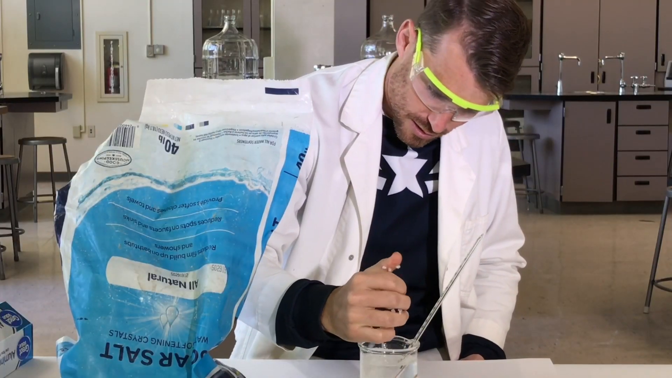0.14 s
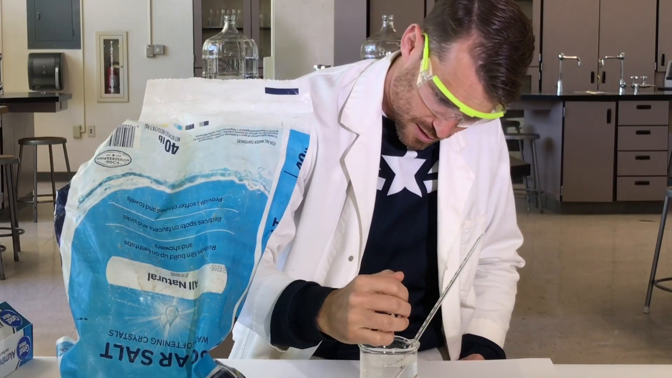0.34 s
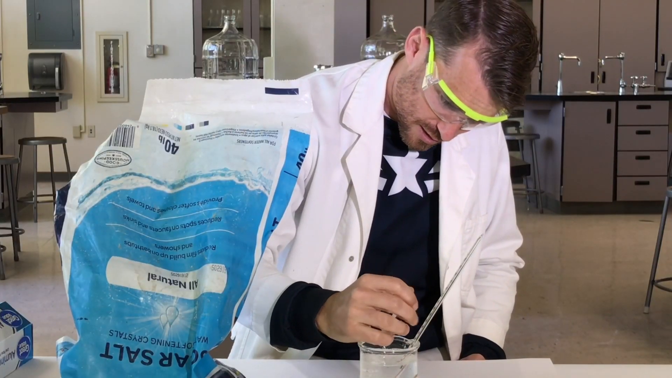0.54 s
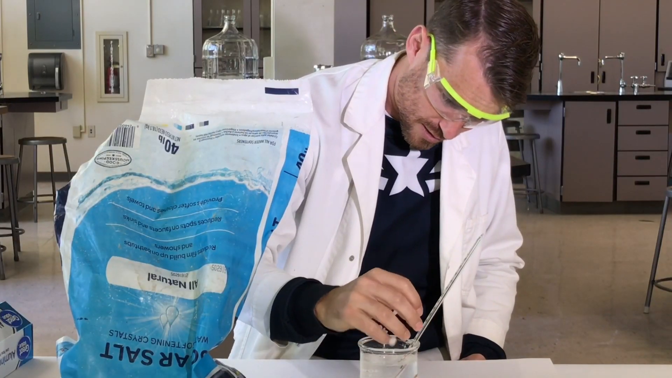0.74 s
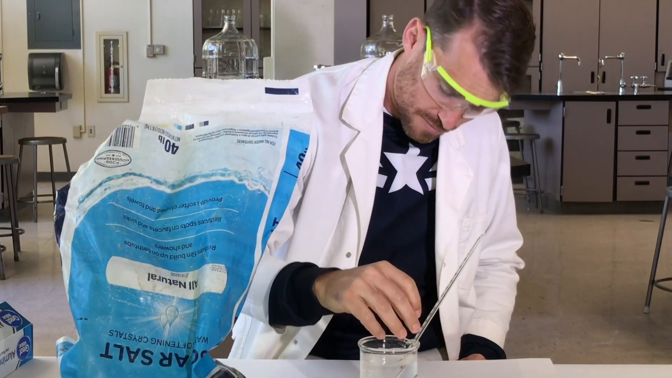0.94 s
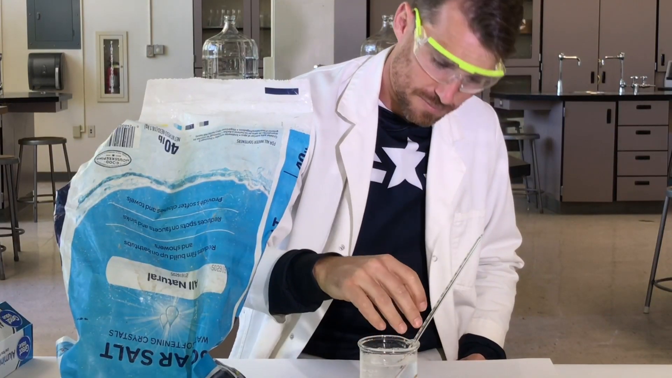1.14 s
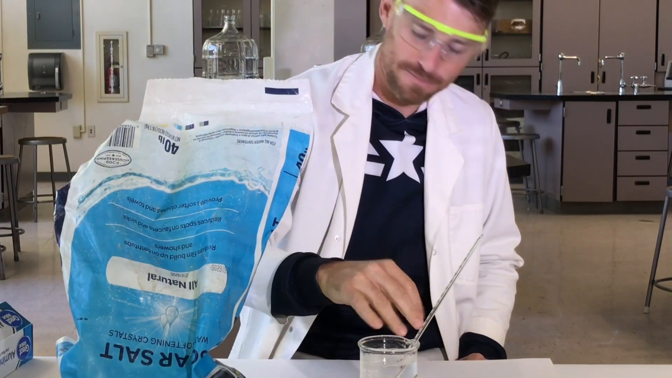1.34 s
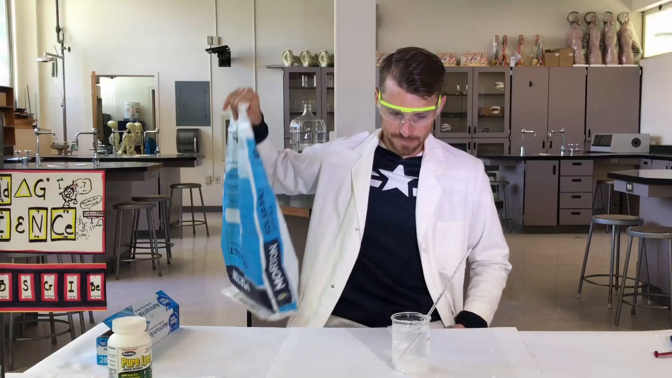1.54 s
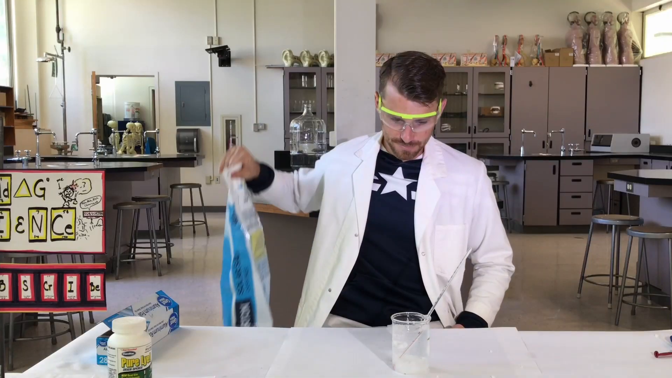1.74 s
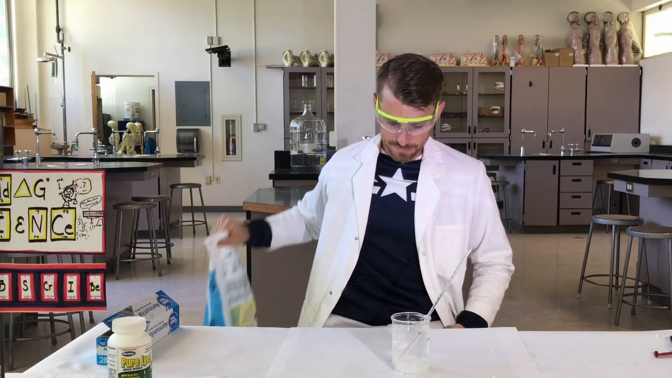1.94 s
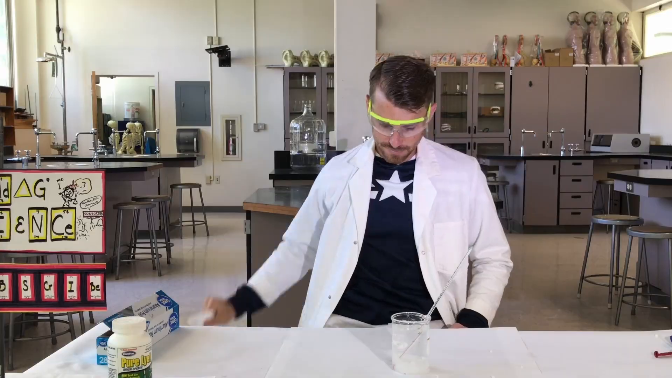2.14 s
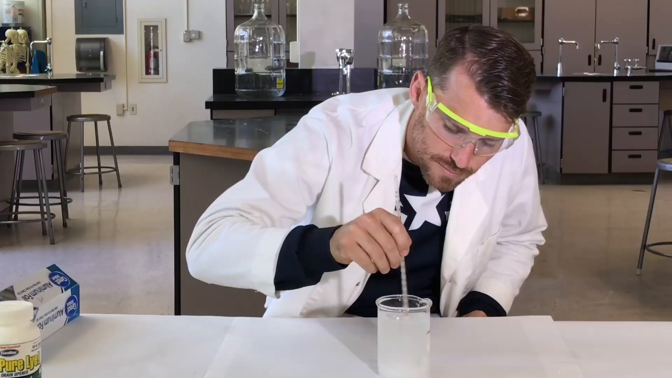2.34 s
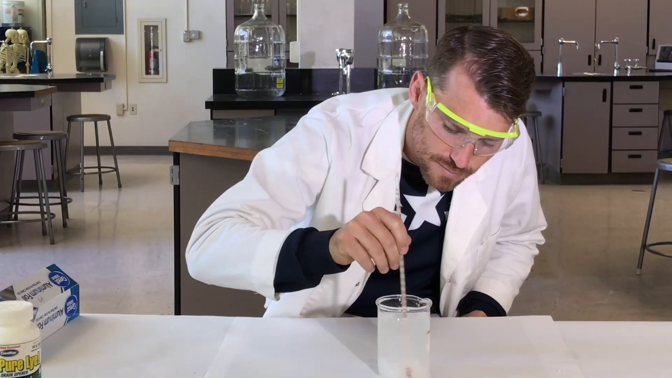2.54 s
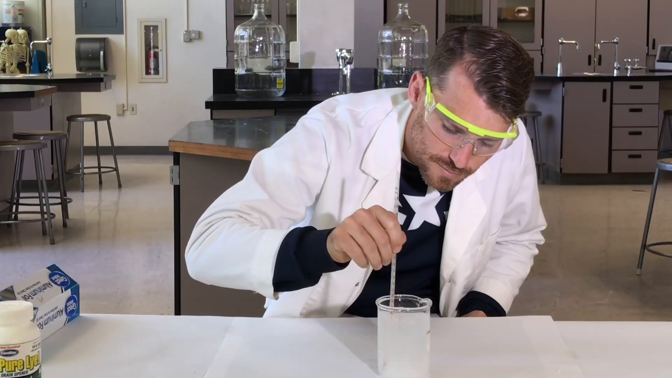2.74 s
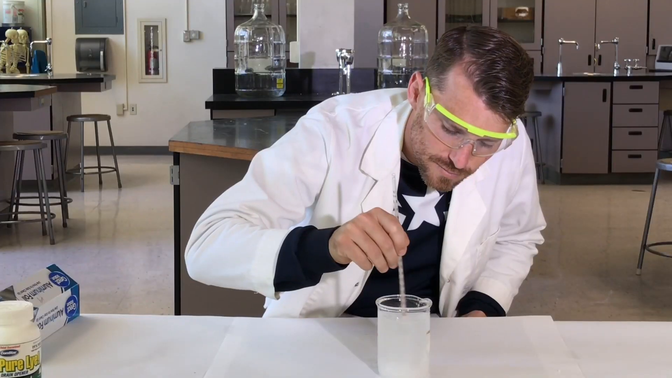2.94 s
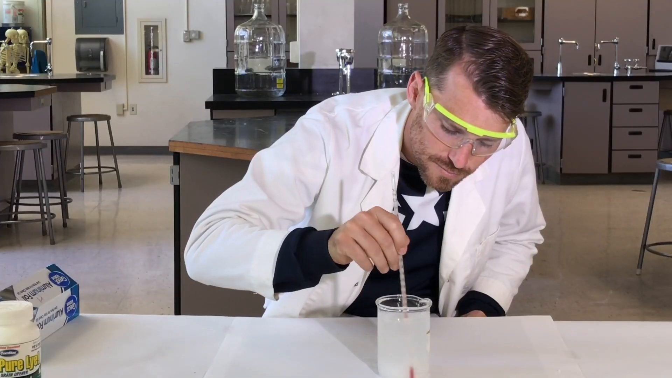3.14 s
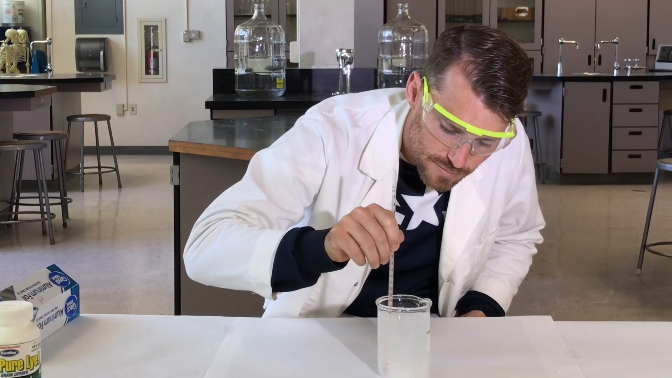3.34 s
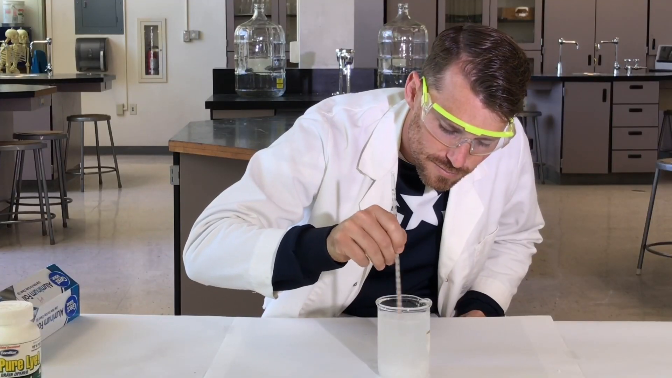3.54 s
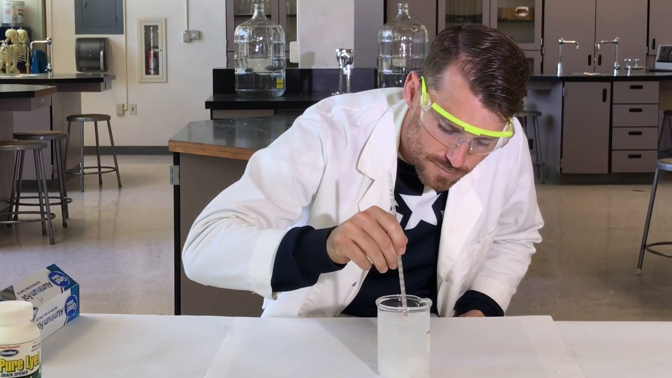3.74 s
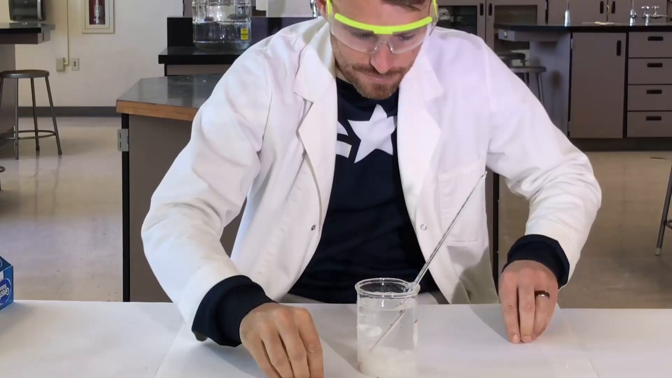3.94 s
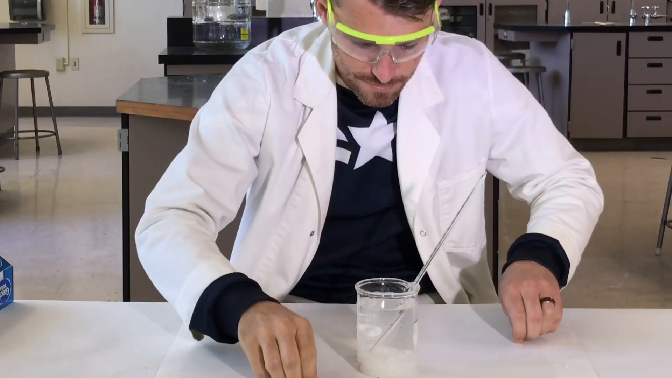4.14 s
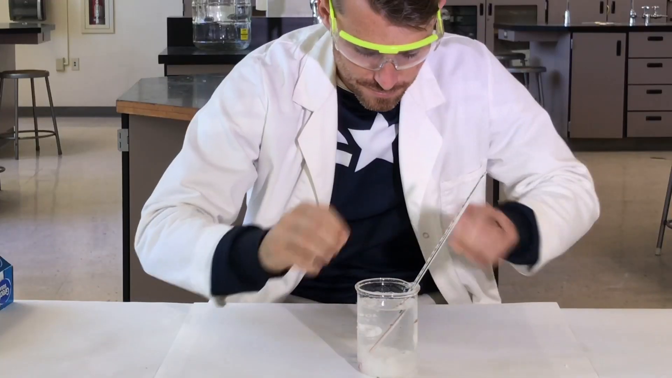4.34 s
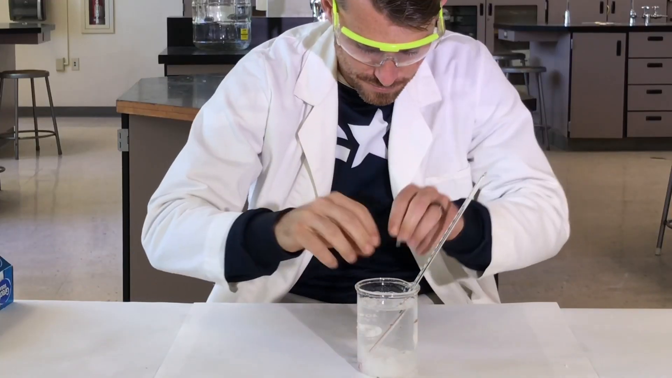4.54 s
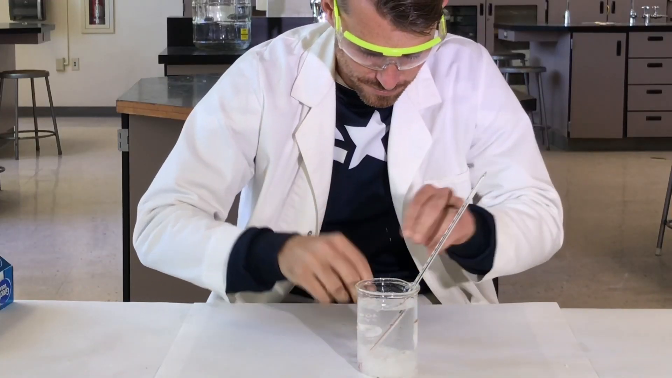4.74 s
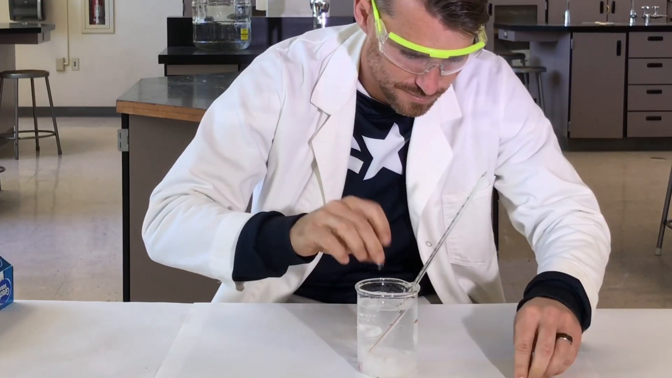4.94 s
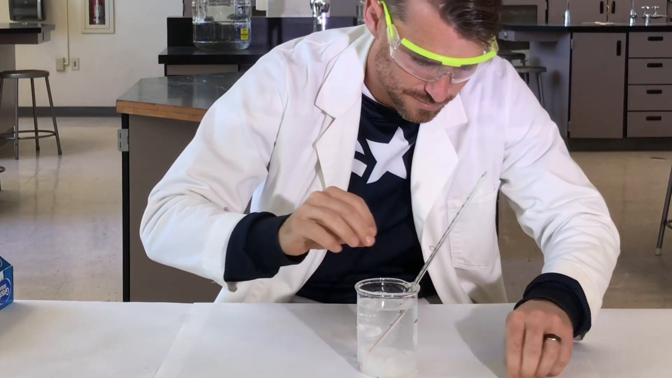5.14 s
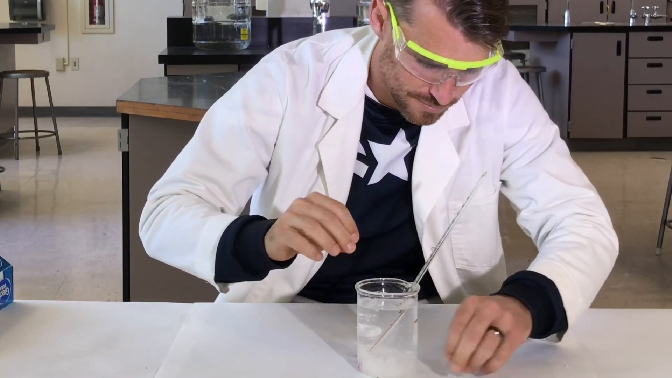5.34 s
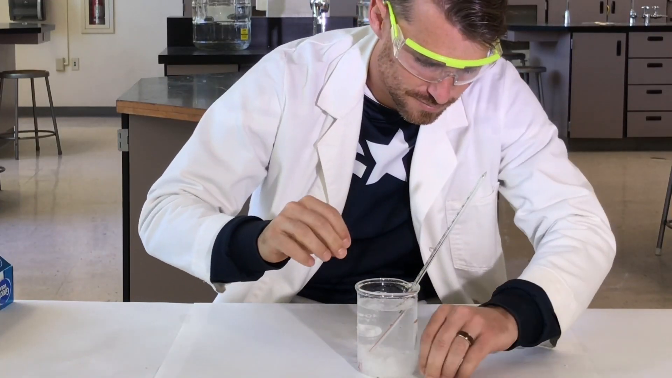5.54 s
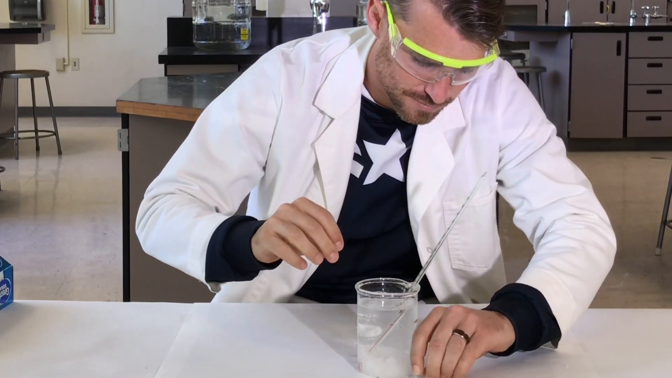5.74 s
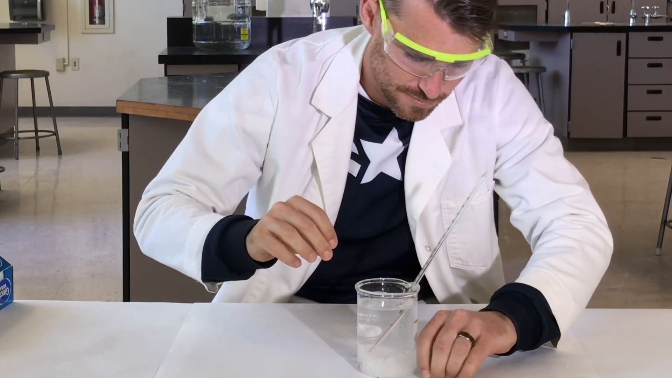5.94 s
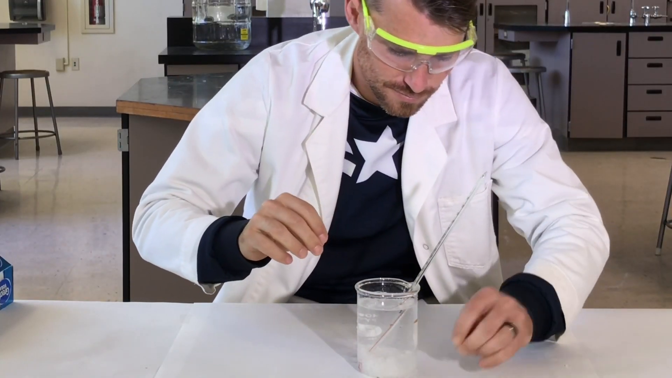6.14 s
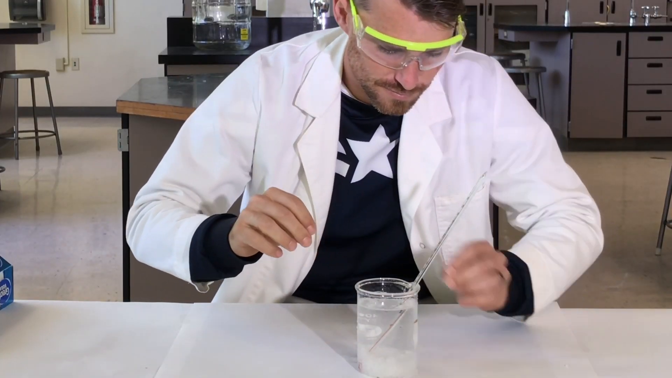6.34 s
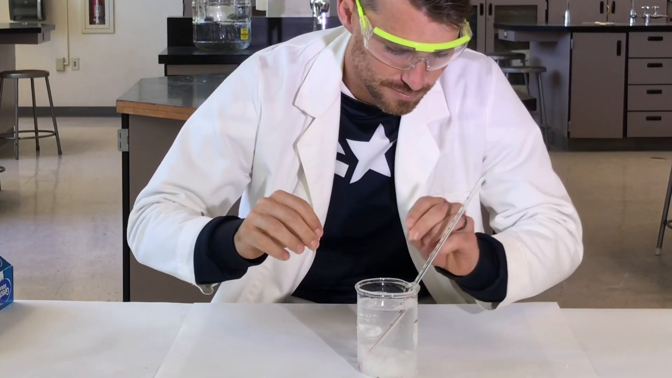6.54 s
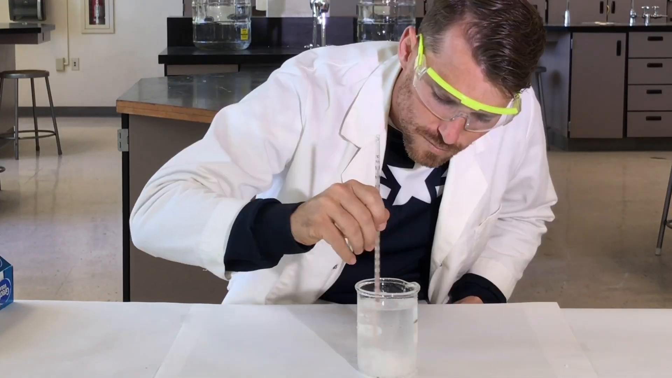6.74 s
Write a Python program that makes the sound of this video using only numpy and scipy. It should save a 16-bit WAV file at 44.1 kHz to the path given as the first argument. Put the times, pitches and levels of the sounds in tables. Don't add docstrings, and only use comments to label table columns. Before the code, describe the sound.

Low ventilation runs throughout a hard-walled lab. Near the microphone, crystals plink into water and click on glass; after a cut, a plastic sack farther off creases, snaps sharply twice and thumps down, loudest of all. Another abrupt cut brings gritty stirring with dull, water-damped glass knocks and crunches. Then hands brush and tap the bench, a few crystals drop, and a low motor faintly winds up.

```python
import sys
import numpy as np
from scipy import signal
from scipy.fft import rfft, irfft
from scipy.io import wavfile
from scipy.ndimage import uniform_filter1d

SR = 44100
rng = np.random.default_rng(int(sys.argv[2]) if len(sys.argv) > 2 else 0)


def waveform_to_disk(signal):
    frames = np.transpose(np.atleast_2d(signal))
    scaled = np.clip(frames, -1, 1) * 32767
    samples = np.round(scaled).astype(np.int16)
    wavfile.write(sys.argv[1], SR, samples)


def amplitude_ratio(level_db):
    exponent = np.asarray(level_db, float) / 20
    return 10 ** exponent


N = 299432

# t/s of silence, fade out/s, fade in/s
JOINS = [
    (1.508, 0.049, 0.02),
    (2.307, 0.027, 0.006),
    (3.941, 0.024, 0.0083),
    (4.806, 0.0345, 0.024),
    (6.773, 0.032, 0.025),
]
# f/Hz, level/dB per Hz
AIR_COLOUR = [(15, -2.5), (35, 0.5), (72, -4.5), (115, -1.5), (180, -8.5), (260, -19), (450, -33),
              (700, -24.5), (1400, -29), (2400, -31.5), (4000, -34), (8000, -38), (13000, -41.5),
              (16000, -39.5)]
# t/s, level/dB
AIR_LEVEL = [(0, -46.5), (1.5, -43), (2.3, -42.5), (3.94, -43.5), (4.8, -44.5), (6.79, -43.5)]
# f/Hz, width/Hz, level/dB
HUMS = [(360, 30, -69.5), (438.4, 16, -64.5), (650, 5.4, -72.5), (1280, 12, -77), (1870, 8, -79),
        (2110, 8, -77)]
# t/s, low f/Hz, low level/dB, high f/Hz, high level/dB
MOTOR = [(4.82, 71, -61, 162.0, -60), (5.04, 73.1, -55.5, 162.0, -57), (5.39, 73.8, -57, 162.2, -55),
         (5.74, 74.8, -52, 163.4, -55.5), (6.0, 74.8, -53, 164.5, -55), (6.75, 74.7, -54.5, 164.9, -51),
         (6.78, 74.7, -70, 164.6, -68)]
# t/s, fall/s, f/Hz, width/Hz, level/dB
RINGS = [(0, 0.11, 424, 256, -36.5), (0, 0.089, 1394, 161, -40.5), (0, .12, 2280, 300, -48.5),
         (0.675, .17, 1040, 110, -52), (0.856, .13, 1040, 110, -54), (1.626, .09, 2700, 900, -46),
         (0.49, .1, 1320, 200, -50), (3.969, .015, 2000, 4000, -38), (4.071, .006, 8000, 7000, -55),
         (5.697, .07, 2500, 200, -47.5), (5.7, 0.2, 3240, 90, -57.5), (5.7, .08, 1580, 200, -47.5),
         (5.701, .025, 8800, 2000, -45)]
# peak t/s, rise/s, f/Hz, width/Hz, level/dB
RUBBED = [(0.034, 0.034, 8400, 1500, -42), (4.9, 0.15, 366, 36, -56), (5.15, 0.15, 372, 29, -56),
          (5.91, .05, 352, 40, -55), (6.025, .06, 358, 30, -54), (5.195, .04, 65, 40, -46),
          (1.385, .06, 12300, 300, -72), (1.54, .035, 8000, 2200, -57), (5.212, 0.2, 2550, 650, -60),
          (5.25, .05, 13500, 4500, -62), (3.4, .17, 370, 45, -56.5), (6.0, .08, 5700, 250, -64),
          (5.995, .07, 6700, 700, -60), (5.955, .08, 7800, 400, -66), (6.0, .05, 10000, 900, -63),
          (6.002, .03, 13000, 4500, -62), (4.11, .12, 8000, 3000, -60)]
# start t/s, peak t/s, end t/s, palm level/dB, grains level/dB
SWEEPS = [(1.497, 1.553, 1.6, -50.5, -56), (3.943, 3.963, 4.146, -41.5, -54),
          (3.852, 4.151, 4.22, -65.5, -61.5), (4.809, 4.891, 5.14, -56, -60),
          (5.023, 5.038, 5.23, -65, -92), (5.0, 5.236, 5.26, -53.5, -58), (5.593, 5.617, 5.69, -54, -64),
          (5.682, 5.693, 5.74, -32.5, -34.5), (5.691, 5.725, 5.82, -61, -80), (5.82, 5.85, 6.4, -56, -64),
          (5.835, 6.01, 6.03, -45.5, -54.5), (6.304, 6.354, 6.44, -74, -61), (6.771, 6.775, 7, -52, -44)]
# f/Hz, level/dB per Hz
PALM_COLOUR = [(250, -1), (400, 5.5), (1000, 5), (1700, -4), (2500, -6.5), (3300, -11), (5000, -19.5),
               (9000, -35)]
# f/Hz, level/dB per Hz
GRAIN_COLOUR = [(2500, 2.5), (4500, 5), (7500, 3.5), (10000, -0.5), (13000, -15), (16000, -20)]
# t/s, peak level/dB, centre f/Hz
TICKS = [(0.005, -31, 9350), (0.015, -41, 11500), (0.0446, -29.5, 8500), (0.0495, -36, 9000),
         (0.0742, -37, 11600), (0.158, -47, 11000), (0.1723, -35, 10500), (0.193, -33, 12600),
         (0.267, -45, 10000), (0.1082, -50, 3460), (0.1715, -49, 3270), (0.192, -34, 6200),
         (0.2155, -37.5, 11800), (0.2427, -38, 7560), (0.3554, -23, 8460), (0.3626, -37, 10100),
         (0.369, -32, 4950), (0.373, -38, 4130), (0.3988, -37, 7500), (0.418, -45, 3340),
         (0.4394, -39, 6200), (0.5344, -50, 5400), (0.631, -43, 8300), (0.647, -38.5, 6240),
         (0.667, -34, 3430), (0.837, -44, 7600), (0.8792, -37, 8460), (0.9204, -42.5, 8250),
         (0.952, -47, 7600), (0.9606, -48, 3350), (1.1135, -46, 7800), (1.222, -52, 7500),
         (1.231, -56, 12800), (3.9675, -40, 7000), (1.331, -56, 6500), (1.343, -56, 8000),
         (1.576, -52, 8500), (1.783, -43.5, 7600), (1.795, -35.5, 5196), (2.265, -17, 6480),
         (2.267, -13.5, 5500), (2.29, -17, 5010), (3.6499, -21, 8950), (4.61, -45.5, 5330),
         (5.562, -59, 8860), (5.609, -52, 7000), (5.692, -35.5, 8750), (5.7012, -29, 8450),
         (5.718, -44, 10800), (5.738, -57, 10100), (5.829, -56, 8500), (5.8705, -54, 10500),
         (5.925, -54, 7000), (6.6716, -44, 3640), (6.6713, -40, 8700)]
# t/s, peak level/dB, bubble f/Hz,
# splash level/dB
DROPS = [(0.029, -37.5, 382, -7), (0.218, -46.5, 700, -7), (0.266, -48, 377, 5), (0.355, -35, 480, 1),
         (0.482, -43, 353, -7), (0.667, -39.5, 347, 0), (0.848, -45, 360, 3),
         (0.024, -39, 1365, -12), (0.161, -41, 1330, -24), (0.198, -39.5, 1650, -5),
                (0.216, -41.5, 1500, -8), (0.266, -39.5, 1610, -6), (0.305, -34.5, 1213, -10),
                (0.355, -38, 1003, 1.5), (0.4809, -30, 1280, -18), (0.6332, -36.5, 1380, -18),
                (0.6676, -28, 1050, -11.5), (0.848, -34, 1015, -8), (0.952, -53, 980, 1),
                (4.5759, -55, 1370, -18),
         (0.0726, -53, 2510, -12), (0.106, -48, 2360, -10), (0.1714, -49, 3380, -15),
               (0.3032, -50.5, 2110, -4), (0.356, -39, 1740, 3), (0.424, -45.5, 3250, -6),
               (0.4815, -44, 1750, -9), (0.495, -47, 1870, -11), (0.207, -50, 2550, -9),
               (0.849, -54, 2400, -7), (0.6656, -44.5, 2410, -20), (0.8645, -39.5, 2280, -17),
               (0.9157, -44.5, 3040, -12), (1.065, -44.5, 2050, -12), (4.657, -44, 2380, -13),
               (5.0377, -41.5, 2110, -16)]
# t/s, level/dB
DUST_LEVEL = [(0.0, -46.5), (0.296, -58.5), (0.404, -57), (0.67, -62.5), (1.1, -72)]
# f/Hz, level/dB per Hz
DUST_COLOUR = [(250, 9), (500, 7), (1400, 3), (2400, -3), (4000, -5), (9000, -7.5), (16000, -13)]
# t/s, peak level/dB, brightness level/dB, upper modes level/dB
KNOCKS = [(2.323, -25.5, -19, -0.5), (2.563, -32, -25.5, 0), (2.572, -14.5, -40, -7),
          (2.867, -34.5, -35, 2), (2.9048, -24, -4, 1), (2.9085, -21.5, -7, 2), (2.927, -27, -14, -18),
          (2.951, -35, -5, -10), (3.05, -48.5, 15.5, -4), (3.187, -34, -8, -8), (3.2075, -20.5, -5, 1),
          (3.222, -23, -18, -13), (3.4723, -18.5, -12, -4), (3.487, -26.5, -14, -1.5)]
# f/Hz, level/dB, time to fall 60 dB/s
BEAKER = [(663, -1.5, 0.055), (756, -8.5, .035), (890, -8.5, 0.039), (1023, -5, 0.089), (1182, 7.5, 0.032),
          (1377, 1, 0.05), (1500, -2, 0.024), (2820, -11.5, .03)]
# t/s, scrape level/dB
STIR_LEVEL = [(2.305, -45), (2.325, -46.5), (2.354, -43), (2.5, -43.5), (2.53, -46.5), (2.768, -41.5),
              (2.85, -46.5), (3.06, -44), (3.33, -42), (3.436, -45), (3.6, -43), (3.78, -44.5),
              (3.88, -39.5), (3.94, -47.5)]
# f/Hz, level/dB per Hz
STIR_COLOUR = [(150, -38), (250, -23.5), (342, -0.5), (557, -12), (710, -2), (906, -5.5), (1180, -5),
               (2020, -5.5), (2810, -6), (3120, -10.5), (4570, -12.5), (7700, -4), (11100, -9.5),
               (13200, -7), (16000, -17.5)]
# f/Hz, width/Hz, level/dB
GLASS = [(2190, 120, -22), (2736, 170, -5.5), (3570, 140, -7.5), (4120, 110, -1), (5670, 240, 0),
         (7780, 700, -8.5), (8330, 280, -8), (9650, 500, -3.5), (12850, 900, -11)]
# t/s, peak level/dB, shard f/Hz
CRUNCHES = [(2.354, -26, 8000), (2.387, -26, 5500), (2.447, -29, 8000), (2.4745, -27, 8500),
            (2.501, -25, 6500), (2.614, -29.5, 8500), (2.657, -31, 5840), (2.726, -31, 9000),
            (2.734, -26, 8500), (2.765, -28, 9000), (2.795, -36, 8500), (2.948, -37, 8200),
            (3.024, -33, 7500), (3.048, -24, 8500), (3.0552, -32, 2940), (3.1133, -26, 6660),
            (3.184, -27, 7840), (3.245, -27, 7960), (3.351, -29, 3500), (3.363, -19.5, 8460),
            (3.3692, -25, 7500), (3.384, -41, 11000), (3.409, -23, 8800), (3.4555, -36, 12000),
            (3.53, -24, 7460), (3.555, -27, 7600), (3.6147, -24, 8800), (3.632, -34, 8500),
            (3.648, -28, 8950), (3.654, -21.5, 8500), (3.684, -40, 8000), (3.721, -30, 11900),
            (3.752, -27.5, 7840), (3.8537, -27, 9100), (3.876, -26, 2980), (3.921, -34, 9000)]
# f/Hz, level/dB per Hz
CRUNCH_COLOUR = [(900, -67), (2200, 0.5), (4500, -6), (8000, 7.5), (10500, -4), (13000, 0), (16000, -6)]
# t/s, level/dB
JOLTS = [(2.315, -46), (2.601, -34.5), (2.916, -41), (3.22, -41), (3.39, -47), (3.485, -45), (3.67, -51),
         (3.9, -57)]
# t/s, peak level/dB, centre f/Hz
CREASES = [(1.6221, -31.5, 2637), (1.6225, -35.5, 1202), (1.649, -44.5, 2555), (1.662, -41.5, 2954),
           (1.702, -33.5, 1500), (1.721, -39, 2795), (1.7815, -34.5, 1300), (1.7888, -26.5, 1442),
           (1.789, -35, 3200), (1.797, -31, 1500), (1.8065, -33, 600), (1.816, -41.5, 2625),
           (1.8433, -34, 1500), (1.844, -37, 2600), (1.905, -30, 3300), (1.935, -32.5, 3450),
           (2.066, -33.5, 3616), (2.088, -34.5, 4194), (2.12, -35, 2613)]
# t/s, level/dB, dull above f/Hz
SNAPS = [
    (1.8944, -4.5, 14800),
    (1.897, -15.5, 6110),
    (2.0494, -9.5, 11000),
    (2.052, -11, 5000),
    (2.226, -26, 2600),
]
# f/Hz, level/dB per Hz
SNAP_COLOUR = [(300, -20), (900, -18.5), (1400, -5.5), (2300, -7), (3200, -1.5), (5000, -9.5), (8200, -4.5),
               (10500, -19.5), (16000, -21.5)]
# start t/s, peak t/s, end t/s, level/dB
RUSTLE = [
    (1.6253, 1.623, 1.8, -41),
    (1.77, 1.793, 1.83, -34.5),
    (1.78, 1.834, 2.0, -46.5),
    (1.847, 2.239, 2.25, -41),
]
# f/Hz, level/dB per Hz
RUSTLE_COLOUR = [(120, -26), (250, 4), (450, 3.5), (1000, -2.5), (2000, -6.5), (3200, -12.5), (4500, -20),
                 (9000, -33), (16000, -43)]
# t/s, body level/dB, crunch level/dB
LANDING = [(2.241, -38.5, -46), (2.247, -23.5, -33), (2.258, -21, -25), (2.264, -18, -20.5),
           (2.268, -15, -9), (2.2745, -13, -16), (2.282, -18, -21), (2.291, -18.5, -25),
           (2.306, -25.5, -35.5)]
# f/Hz, level/dB per Hz
LANDING_COLOUR = [(24, -46.5), (50, -18.5), (95, -0.5), (250, -7.5), (380, -1), (520, -8), (680, -3.5),
                  (1050, -7.5), (1700, -13), (3200, -14), (8000, -36.5)]
# f/Hz, level/dB per Hz
SALT_COLOUR = [(1200, -17), (2500, 0.5), (4000, 1.5), (6000, 1), (9000, -6.5), (12800, -8.5), (16000, -14)]
# t/s, f/Hz, level/dB, time to fall 60 dB/s
THUMP = [
    (2.2545, 660, -15, .06),
    (2.261, 740, -13, .04),
    (2.2715, 95, -7.5, 0.085),
    (2.2722, 372, -6, 0.04),
    (2.2722, 590, -8, 0.035),
    (2.2715, 1060, -7.5, .025),
    (2.2875, 420, -16, .03),
]
# f/Hz, time to fall 60 dB/s
LAB = [(200, 0.24), (1000, 0.59), (3000, 0.48), (6000, 0.55), (14000, 0.17)]
# t/s, above f/Hz
THINNED = [(.035, 2500), (.78, 2000), (1.078, 2500), (1.422, 2500), (1.55, 2000), (1.632, 6000),
           (1.968, 9500), (2.022, 8200), (2.21, 9500), (1.958, 10500), (2.59, 1700), (2.978, 3000),
           (4.705, 2500), (5.092, 1500), (5.176, 2000), (5.648, 3000), (6.17, 2000), (6.243, 3000),
           (6.325, 2500)]

SWELL_DB = -24.5
JOLT_RISE_S, JOLT_FALL_S = 0.064, 0.029
BUBBLE_T60_S, T60_SLOPE = 0.041, -0.57
WANDER_DB = 3.5
SHARD_DB, SHARD_WIDTH = 3, 0.26
CREASE_FALL_S, CREASE_WIDTH = 0.0027, 0.49
CRACKLE_DB, CRACKLE_T60_S = -36, 0.55
BRIGHT_HZ, BRIGHT_T60_S = 5500, 0.34


def evened(x):
    return x / np.sqrt(np.mean(x ** 2) + 1e-20)


def read(points, hz):
    f, value = np.transpose(points)
    return np.interp(np.log(hz + 1), np.log(f + 1), value)


def add(mix, s, sound):
    part = mix[max(round(s * SR), 0):][:len(sound)]
    part += sound[:len(part)]


def level(rows, column=1):
    rows, out = np.array(rows), np.zeros(N)
    t = np.arange(max(rows[0, 0], 0), rows[-1, 0], 1 / SR)
    add(out, t[0], amplitude_ratio(np.interp(t, rows[:, 0], rows[:, column])))
    return out


def swell(start, peak, end, db):
    return level([(start, db + SWELL_DB), (peak, db), (end, db + SWELL_DB)])


def colour(points):
    db = np.maximum(read(points, abs(np.fft.fftfreq(4096, 1 / SR))), -100)
    log_gain = np.log(amplitude_ratio(db))
    return np.fft.ifft(np.exp(log_gain - 1j * signal.hilbert(log_gain).imag)).real[:2048]


def resonate(x, hz, width):
    r = np.exp(-np.pi * width / SR)
    return 2 * signal.lfilter([1 - r], [1, -r * np.exp(2j * np.pi * hz / SR)], x).real


def grit(points, per_s, spread_db, hiss, clump_db, grain_s=0.0026):
    sizes = amplitude_ratio(spread_db * np.minimum(rng.exponential(1, N), 4)) * (rng.random(N) < per_s / SR)
    bursts = evened(signal.lfilter([1], [1, -np.exp(-1 / (grain_s * SR))], sizes))
    slow = uniform_filter1d(uniform_filter1d(rng.standard_normal(N), 200), 200)
    clumps = amplitude_ratio(clump_db * evened(slow))
    rough = (bursts + hiss) * clumps * rng.standard_normal(N)
    return evened(signal.oaconvolve(rough, colour(points))[:N])


def air():
    hz = np.fft.rfftfreq(N, 1 / SR)
    wash = irfft(rfft(rng.standard_normal(N)) * amplitude_ratio(read(AIR_COLOUR, hz)), N)
    wash = evened(wash) * level(AIR_LEVEL) * amplitude_ratio(-7.5)
    hums = sum(amplitude_ratio(db) * evened(resonate(rng.standard_normal(N), f, w)) for f, w, db in HUMS)
    s, low_hz, _, high_hz, _ = np.transpose(MOTOR)
    waver = 1 + 0.001 * evened(uniform_filter1d(rng.standard_normal(N), 4000))
    for column, f in ((2, low_hz), (4, high_hz)):
        speed = np.interp(np.arange(N) / SR, s, f) * waver
        tone = np.sin(2 * np.pi * np.cumsum(speed) / SR)
        hums += level(MOTOR, column=column) * np.sqrt(2) * tone
    return wash + hums


def drones():
    struck = [(s - 0.0042, s, s + fall, db, hz, width) for s, fall, hz, width, db in RINGS]
    rubbed = [(s - rise, s, s + 0.9 * rise, db, hz, width) for s, rise, hz, width, db in RUBBED]
    noise, out = rng.standard_normal(N), np.zeros(N)
    for *shape, hz, width in struck + rubbed:
        out += swell(*shape) * evened(resonate(resonate(noise, hz, width), hz, width))
    return out


def sweeps():
    palm = grit(PALM_COLOUR, 700, spread_db=3.0, hiss=1.0, clump_db=-4.0)
    palm *= sum(swell(*row[:-1]) for row in SWEEPS)
    grains = grit(GRAIN_COLOUR, 900, spread_db=2.5, hiss=.8, clump_db=1.5)
    grains *= sum(swell(*row[:-2], row[-1]) for row in SWEEPS)
    return amplitude_ratio(-3.5) * (palm + grains)


def ticks():
    out, t = np.zeros(N), np.arange(400) / SR
    noise = rng.standard_normal((len(TICKS), len(t)))
    for (s, db, hz), tick in zip(TICKS, noise):
        wide = 0.2 * evened(resonate(resonate(tick, hz, 9000), hz, 9000)) * np.exp(-t / 0.0018)
        ring = np.sin(2 * np.pi * hz * t) * t / 0.00022 * np.exp(1 - t / 0.00016) * 0.86
        add(out, s, amplitude_ratio(db + 6.5) * (wide + ring))
    return out


def plops():
    out, t = np.zeros(N), np.arange(4000) / SR
    drops = DROPS
    for (s, db, hz, splash_db), noise in zip(drops, rng.standard_normal((len(drops), len(t)))):
        bubble = np.sin(2 * np.pi * hz * (t + 0.072 * 0.0023 * (1 - np.exp(-t / 0.0029))))
        splash = resonate(resonate(noise, hz * 1.15, .6 * hz), hz * 1.15, .6 * hz)
        splash = amplitude_ratio(splash_db) * evened(splash)
        t60 = BUBBLE_T60_S * (hz / 1e3) ** T60_SLOPE
        add(out, s, amplitude_ratio(db + 3.5 - 60 * t / t60) * (bubble + splash) * (1 - np.exp(-t / 0.00054)))
    return out + level(DUST_LEVEL) * grit(DUST_COLOUR, 500, spread_db=2.0, hiss=1.1, clump_db=1.5)


def knocks():
    out, t = np.zeros(N), np.arange(4000) / SR
    spot = rng.standard_normal((len(KNOCKS), len(BEAKER), 3))
    scratch = rng.standard_normal((len(KNOCKS), 2, len(t)))
    for (s, db, bright_db, upper_db), chance, (noise, slop) in zip(KNOCKS, spot, scratch):
        ring = np.zeros(len(t))
        for (hz, mode_db, t60), (a, b, c) in zip(BEAKER, chance):
            fall = amplitude_ratio(mode_db + 1.6 * a + upper_db * (hz > 1120) - 60 * t / t60)
            ring += fall * np.sin(2 * np.pi * hz * (1 + 0.01 * b) * t + 0.73 * c)
        body = amplitude_ratio(-10.5 - 60 * t / 0.32) * evened(resonate(resonate(slop, 810, 990), 810, 990))
        contact = amplitude_ratio(bright_db + 0.5 - 60 * t / 0.068) * evened(resonate(noise, 1900, 2400))
        add(out, s, amplitude_ratio(db - 10.5) * (ring + body + contact) * (1 - np.exp(-t / 0.0001)))
    return out


def stirring():
    grind = grit(STIR_COLOUR, 1100, spread_db=3.2, hiss=.4, clump_db=1.8, grain_s=.0007)
    wander = evened(uniform_filter1d(uniform_filter1d(rng.standard_normal(N), size=1500), size=1500))
    wall = np.zeros(N)
    for k, (hz, width, db) in enumerate(GLASS):
        moving = amplitude_ratio(db + WANDER_DB * np.roll(wander, 9000 * k))
        wall += moving * resonate(np.roll(grind, 9000 * k), hz, width) * 2.77
    scrape = evened(grind + wall) * level(STIR_LEVEL) * amplitude_ratio(1.5)

    cracks, t, shard = np.zeros(N), np.arange(600) / SR, colour(CRUNCH_COLOUR)[:300]
    for (s, db, hz), noise in zip(CRUNCHES, rng.standard_normal((len(CRUNCHES), len(t)))):
        wide = evened(np.convolve(noise, shard)[:len(t)])
        pitched = amplitude_ratio(SHARD_DB) * evened(resonate(noise[::-1], hz, SHARD_WIDTH * hz))
        add(cracks, s - .001, amplitude_ratio(db - 10.5) * t / 0.0021 * np.exp(1 - t / 0.0015) * (wide + pitched))

    rocking = evened(resonate(rng.standard_normal(N), 26, 40))
    rocking += 1.7 * evened(resonate(rng.standard_normal(N), 197.4, 19))
    jolts = sum(swell(s - JOLT_RISE_S, s, s + JOLT_FALL_S, db) for s, db in JOLTS)
    return scrape + cracks + amplitude_ratio(-5.5) * jolts * rocking


def creases():
    out, t = np.zeros(N), np.arange(800) / SR
    for (s, db, hz), noise in zip(CREASES, rng.standard_normal((len(CREASES), len(t)))):
        width = CREASE_WIDTH * hz
        ring = np.sin(2 * np.pi * hz * t) + 0.6 * evened(resonate(resonate(noise, hz, width), hz, width))
        add(out, s, amplitude_ratio(db - 4.0) * ring * np.exp(-t / CREASE_FALL_S) * (1 - np.exp(-t / 0.0003)))
    return out


def pops():
    out, pop = np.zeros(N), colour(SNAP_COLOUR)
    burst = .15 * rng.standard_normal((len(SNAPS), 200)) * np.exp(-np.arange(200) / SR / .0015)
    burst[:, 0] = 1
    for (s, db, dull_hz), b in zip(SNAPS, burst):
        crack = signal.lfilter(*signal.butter(2, dull_hz, fs=SR), np.convolve(b, pop))
        add(out, s, amplitude_ratio(db) * crack / abs(crack).max())
    crackle = grit(SNAP_COLOUR, 600, spread_db=2.0, hiss=.8, clump_db=2.5)
    for side, t60 in (("low", CRACKLE_T60_S), ("high", BRIGHT_T60_S)):
        creasing = sum(level([(s, db + CRACKLE_DB), (s + t60, db + CRACKLE_DB - 60)]) for s, db, _ in SNAPS)
        out += creasing * signal.lfilter(*signal.butter(1, BRIGHT_HZ, side, fs=SR), crackle)
    return out


def landing():
    out = level(LANDING, column=1) * grit(LANDING_COLOUR, 2500, spread_db=1.5, hiss=1.2, clump_db=1)
    out += level(LANDING, column=2) * grit(SALT_COLOUR, 2500, spread_db=1.5, hiss=1.2, clump_db=1)
    for s, hz, db, t60 in THUMP:
        t = np.arange(0, JOINS[1][0] - s, 1 / SR)
        add(out, s, amplitude_ratio(db - 60 * t / t60) * np.sin(2 * np.pi * hz * t) * (1 - np.exp(-t / 0.0013)))
    return out


def sack():
    shifting = grit(RUSTLE_COLOUR, 690, spread_db=2.5, hiss=1.0, clump_db=1.0)
    shifting *= sum(swell(*row) for row in RUSTLE)
    return pops() + amplitude_ratio(-0.5) * shifting + landing() + creases()


def lab_tail():
    taps = np.zeros(SR)
    at = np.arange(100, SR - 20, 20)
    taps[at + rng.integers(0, 20, len(at))] = rng.choice([-1., 1.], len(at))
    taps *= amplitude_ratio(2.5 * evened(uniform_filter1d(rng.standard_normal(SR), 250)))
    hz, t, z = signal.stft(taps, SR, nperseg=256)
    tail = signal.istft(z * amplitude_ratio(-60 * t / read(LAB, hz)[:, None]), SR, nperseg=256)[1]
    return tail / np.linalg.norm(tail)


def scene():
    clicks = ticks() + sweeps() + drones()
    near = plops() + knocks() + stirring()
    far = sack()
    send = amplitude_ratio(-11.5) * clicks + amplitude_ratio(-10.0) * near + amplitude_ratio(-6.0) * far
    tail, t = lab_tail(), np.arange(N) / SR
    takes = np.split(send, [round(s * SR) for s, _, _ in JOINS])
    wet = np.concatenate([signal.fftconvolve(take, tail)[:len(take)] for take in takes])
    fades = np.prod([np.clip(np.maximum((s - t) / out, (t - s) / back), 0, 1) for s, out, back in JOINS], 0)
    return ((clicks + near + far + wet + air()) * fades)[None]


def thin_out(x):
    hz, t, z = signal.stft(x, SR, nperseg=512, noverlap=384)
    for (s, above_hz), draw in zip(THINNED, rng.random((len(THINNED), len(hz)))):
        wiped = above_hz > 5500
        chance = 0.2 * (hz < 13000) * (not wiped)
        kept = (hz < above_hz) | (np.repeat(draw, 2)[:len(hz)] < chance)
        left_db = -40 if wiped else -17
        z[..., abs(t - s) < .008] *= np.maximum(kept, amplitude_ratio(left_db))[:, None]
    return signal.istft(z, SR, nperseg=512, noverlap=384)[1][:, :N]


def top_cut(x):
    return signal.sosfilt(signal.butter(12, 16540, fs=SR, output="sos"), x)


def record(dry):
    limited = signal.oaconvolve(np.tanh(dry), signal.firwin(511, 15800, fs=SR)[None], "same")
    return top_cut(thin_out(limited))


dry = scene()
out = record(dry)
waveform_to_disk(out)
```